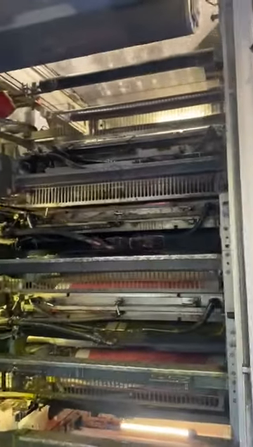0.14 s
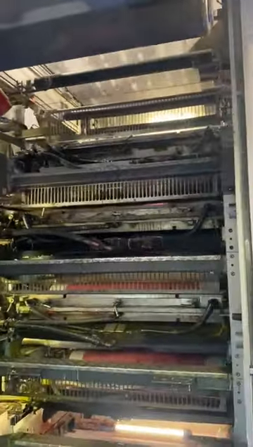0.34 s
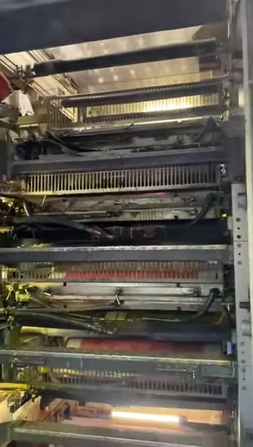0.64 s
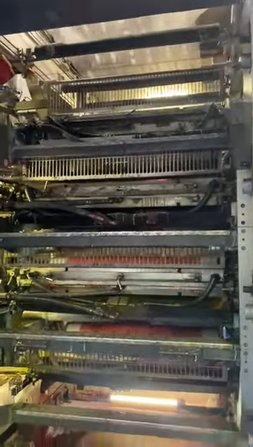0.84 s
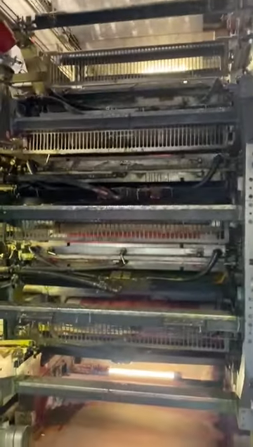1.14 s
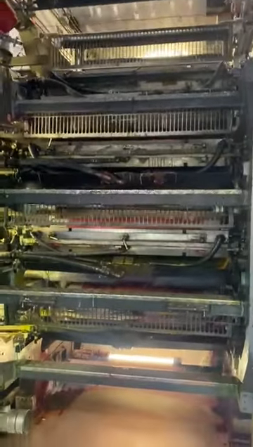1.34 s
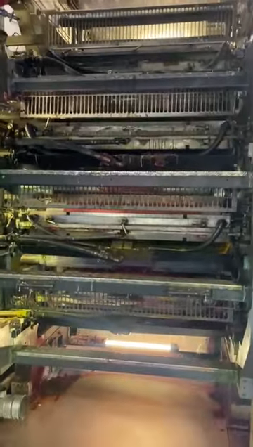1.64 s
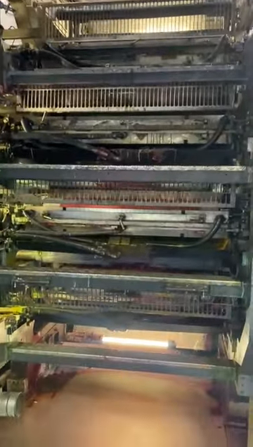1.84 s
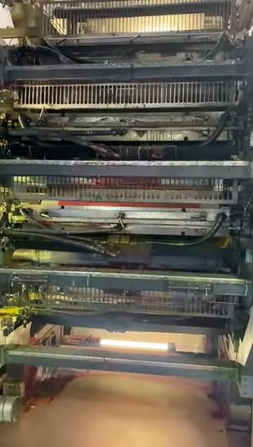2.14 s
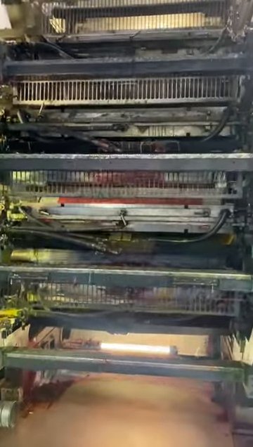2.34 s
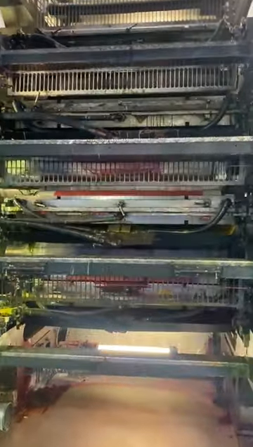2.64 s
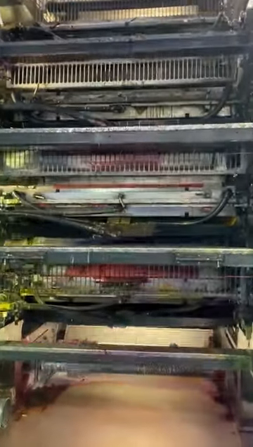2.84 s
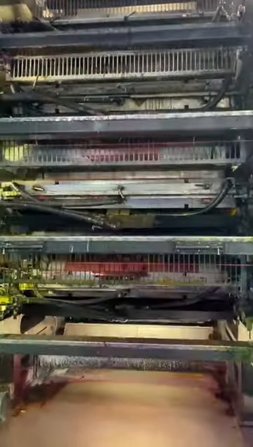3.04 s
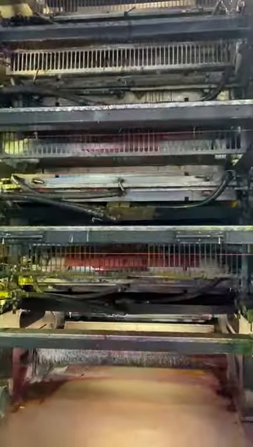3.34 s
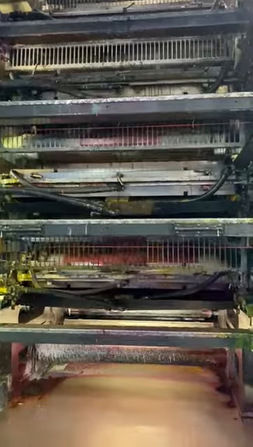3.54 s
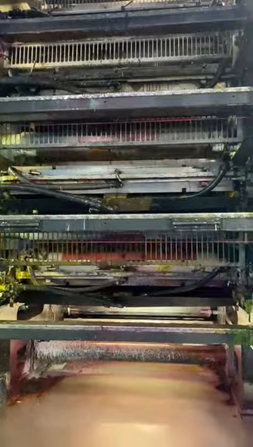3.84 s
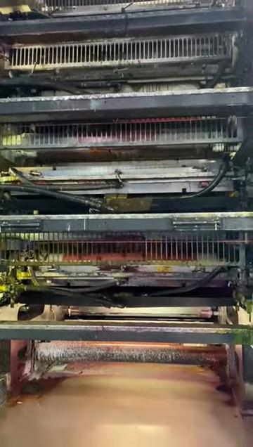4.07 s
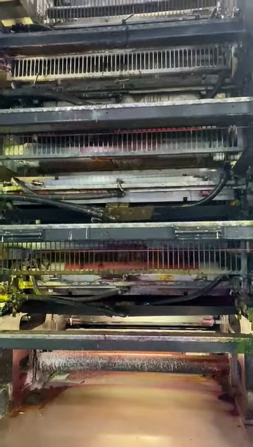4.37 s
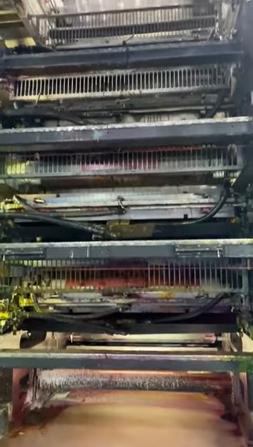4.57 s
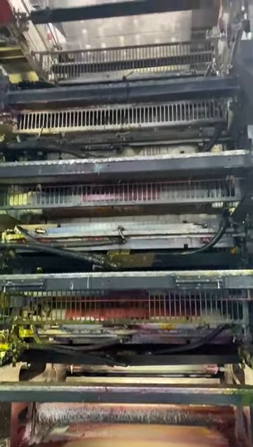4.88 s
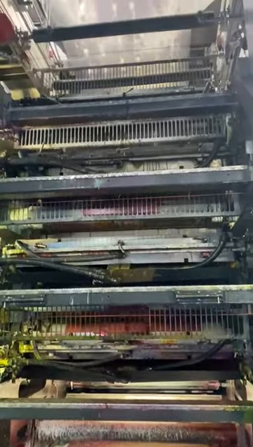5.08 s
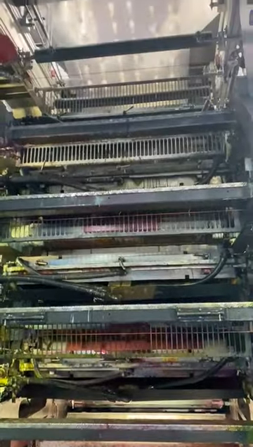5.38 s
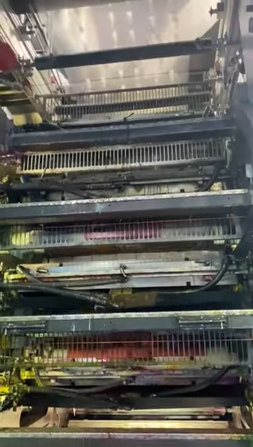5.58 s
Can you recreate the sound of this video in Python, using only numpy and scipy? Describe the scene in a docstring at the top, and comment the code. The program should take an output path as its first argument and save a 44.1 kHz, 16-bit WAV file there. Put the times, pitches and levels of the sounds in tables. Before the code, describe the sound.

A large web printing press runs without pause in a hard factory hall, heard from a few steps away. Broad paper and roller hiss rides over a deep rumble pulsing about seven times a second. Low motor hum wavers, irregular soft thumps blur into the frame, guards chatter finely, and tiny squeaks appear near two seconds. A handheld stereo microphone gives a dense, slightly dull top.

```python
"""A large web printing press runs steadily in a factory hall, heard from a few steps away.
Shaped noise, part of it repeating about seven times a second, makes the frame's rumble and the hall's roar;
brighter noise makes the hiss of paper web and inked rollers. Short chirps thump in the frame.
Wavering sines and narrow noise make the gear, motor and bearing tones; decaying modes are the chattering guards.
Gliding sines squeak faintly, and a swelling sine with noise sidebands is the motor drive's thin whistle."""
import sys
import numpy as np
from scipy import signal
from scipy.fft import rfft, irfft
from scipy.io import wavfile
from scipy.ndimage import uniform_filter1d

SR = 44100
rng = np.random.default_rng(int(sys.argv[2]) if len(sys.argv) > 2 else 0)


def unload_audio(sound):
    """Save the sound as a 16-bit wav file, at the path given as the first command line argument."""
    columns = np.transpose(np.atleast_2d(sound))
    # keep every value between -1 and 1, then stretch to whole-number steps
    steps = np.round(np.clip(columns, -1, 1) * 32767)
    wavfile.write(sys.argv[1], SR, steps.astype(np.int16))


N = 251811
TIME, FREQS = np.arange(N) / SR, np.fft.rfftfreq(N, 1 / SR)


def amp(db):
    """Decibels to gain."""
    return 10 ** (np.asarray(db) / 20)


def unit(x):
    """Scales to rms 1."""
    return x / np.sqrt(np.mean(abs(x) ** 2) + 1e-20)


def across(table, axis=1):
    """One column of a frequency table at every frequency, interpolated over log frequency."""
    rows = np.array(table, float)
    return np.interp(np.log(FREQS + 1), np.log(rows[:, 0] + 1), rows[:, axis])


def along(table, axis=1):
    """One column of a time table at every sample."""
    rows = np.array(table, float)
    return np.interp(TIME, rows[:, 0], rows[:, axis])


def white():
    """Spectrum of white noise with a power of 1 per Hz."""
    return rfft(rng.standard_normal(N)) * np.sqrt(SR / 2)


def drift(rate_hz):
    """Slow random wandering of rms 1: Gaussian low-passed noise on a coarse time grid."""
    size, span_s = 16384, 2 * TIME[-1]
    hz = np.fft.rfftfreq(size, span_s / size)
    spectrum = rfft(rng.standard_normal(size)) * np.exp(-(hz / rate_hz) ** 2)
    slow = irfft(spectrum)
    return unit(np.interp(TIME, np.linspace(0, span_s, size), slow))


def fade(db_per_s):
    """A steady fall in dB, zero halfway through."""
    return db_per_s * (TIME.mean() - TIME)


def fuzzy(hz, width_hz):
    """Noise in one narrow resonance, rms 1."""
    return unit(irfft(white() / (1 + ((FREQS - hz) / width_hz) ** 2), N))


def ports(direct, diffuse):
    """Two microphone ports share one spectrum with a phase lag; scattered sound makes them partly unlike."""
    # the hall at the two ports: freq_hz, likeness_0_to_1, left_lead_rad, left_minus_right_db
    port_table = [(70, .999, -.01, -.4), (260, .997, -.03, -2), (530, .965, -.05, -3.2),
                  (800, .89, -.05, -1.9), (950, .81, -.05, -2.5), (1300, .88, -.1, -.7),
                  (1520, .88, -.08, -.5), (1860, .99, .02, 0), (2250, .87, .27, -.1), (2650, .34, .8, -.7),
                  (2830, .25, .6, -.6), (3020, .26, 1.7, -1.2), (3500, .56, .9, -.8), (3780, .56, 1.05, .1),
                  (3980, .72, .45, -.4), (4350, .57, 1, -2.3), (4600, .5, .6, -2.6), (4850, .76, .15, -.9),
                  (5250, .96, .1, .2), (5600, .81, .48, .3), (6130, .69, 1.85, 0), (6300, .78, 2.1, 0),
                  (6470, .96, 2.85, 0), (6600, 1, 3.1, 0), (8200, 1, 3.2, 0), (9000, .44, 4.7, 0),
                  (9600, 1, 6.2, 0)]
    same = across(port_table, axis=1)
    lead_rad = across(port_table, axis=2)
    tilt = amp(across(port_table, axis=3))
    shared = np.sqrt((1 + same) / 2) * direct
    apart = np.sqrt((1 - same) / 2) * diffuse
    left = (shared + apart) * tilt
    right = (shared - apart) * np.exp(-1j * lead_rad)
    return np.array([left, right]) * np.sqrt(2 / (1 + tilt ** 2))


def wavering(freqs_hz, levels, waver_db, waver_hz, phase_wander_rad, wander_hz):
    """Clean tones, each on its own level curve, unsteady in strength and phase."""
    tones = np.zeros(N)
    for k, hz in enumerate(freqs_hz):
        phase = 2 * np.pi * (hz * TIME + rng.random()) + phase_wander_rad * drift(wander_hz)
        level_db = along(levels, axis=k + 1) + waver_db * drift(waver_hz)
        tones += np.sqrt(2) * amp(level_db) * np.sin(phase)
    return irfft(ports(rfft(tones), 0), N)


def whistle(tone_hz=9998, floor_db=-50, flicker_db=.6, flicker_hz=14, wander_rms_hz=2,
            side_width_hz=6, side_swell_db=2, side_swell_hz=3):
    """The drive's clean switching tone swells and fades as the listener moves; faint sidebands come and go."""
    # swells over the floor: middle_s, half_length_s, level_db
    swell_table = [(.06, .09, -40), (1.33, .06, -43), (1.595, .03, -38.5), (1.95, .03, -45),
                   (2.08, .035, -45), (2.21, .06, -45), (2.45, .1, -48), (2.77, .07, -42),
                   (3.18, .07, -42.5), (3.42, .16, -39.3), (3.61, .04, -38.5), (3.72, .07, -43),
                   (4.61, .09, -44.5), (4.77, .05, -42), (5.08, .06, -43), (5.37, .04, -43)]
    # sidebands that beat against the tone: offset_hz, level_db
    side_table = [(-37, -53.5), (9, -52), (40, -56.5)]
    swell = amp(floor_db)
    for middle_s, half_s, db in swell_table:
        swell = swell + amp(db) * np.exp(-((TIME - middle_s) / half_s) ** 2)
    phase = 2 * np.pi * np.cumsum(tone_hz + wander_rms_hz * drift(19)) / SR
    tone = np.sqrt(2) * swell * amp(flicker_db * drift(flicker_hz)) * np.sin(phase)
    for offset_hz, db in side_table:
        side = fuzzy(tone_hz + offset_hz, side_width_hz) * amp(side_swell_db * drift(side_swell_hz))
        tone += amp(db) * unit(side)
    return irfft(ports(rfft(tone), 0), N)


def whine(width_hz=7):
    """Fast bearings and gears sing faintly inside the hiss, as narrow noise."""
    # fuzzy tones: freq_hz, level_db
    whine_table = [(4630, -53), (4808, -51), (5252, -48.5), (5290, -49.4)]
    tones = sum(amp(db) * fuzzy(hz, width_hz) for hz, db in whine_table)
    return irfft(ports(rfft(tones), 0), N)


def gears():
    """Two fast gear meshes ring out of the hiss now and then."""
    # mesh tones: freq_hz
    mesh_hz = [5442, 5515]
    # level curves: time_s, lower_tone_db, upper_tone_db
    mesh_levels = [(0, -50, -52), (.9, -51, -53), (1.15, -44, -46), (1.35, -48, -43), (1.9, -52, -51),
                   (2.2, -52, -47), (2.9, -49, -50), (3.1, -40, -44.5), (3.5, -41, -50), (3.72, -46, -46),
                   (4.1, -52, -54), (4.75, -53, -53), (4.93, -43.5, -53), (5.35, -51, -54),
                   (5.71, -49, -55)]
    return wavering(mesh_hz, mesh_levels, waver_db=1.5, waver_hz=5, phase_wander_rad=.6, wander_hz=4)


def squeaks(level_db=1.2, rough_rad=.2, rough_hz=150):
    """Rubbing parts give short, slightly scratchy tones, each sliding at its own rate."""
    # squeaks: middle_s, half_length_s, pitch_hz, glide_hz_per_s, relative_level_db
    squeak_table = [(1.744, .009, 2578, 8000, -31), (1.754, .009, 3558, 8000, -35),
                    (2.014, .013, 3617, 4000, -32), (2.014, .01, 2589, -2000, -31.5),
                    (2.22, .026, 2874, 2000, -36.5), (2.28, .032, 2976, 1000, -38.5),
                    (2.385, .026, 2475, 5000, -33.5), (2.42, .02, 2705, 3000, -35),
                    (2.622, .018, 2131, 5000, -33.5)]
    sound = np.zeros(N)
    scratch = rough_rad * drift(rough_hz)
    for middle_s, half_s, hz, glide, db in squeak_table:
        t = TIME - middle_s
        phase = 2 * np.pi * (hz * t + glide * t ** 2 / 2) + scratch
        sound += np.sqrt(2) * amp(db + level_db) * np.exp(-(t / half_s) ** 2) * np.sin(phase)
    return np.array([sound, sound])


def clatter(level_db=-36.5, taps_per_s=200, spread_db=3.8, t60_s=.03, detune=.04):
    """Loose guards chatter at random; each tap rings one mode, slightly shifted."""
    # ringing modes of the guards: freq_hz, relative_level_db
    guard_table = [(1150, 0), (1380, 0), (1760, -1), (2110, 0), (2490, 0), (2950, -1), (3300, -3),
                   (3620, 0), (3950, -4), (4200, -2), (4780, -1), (5280, 0), (5780, 0)]
    t = TIME[:SR // 16]
    sound = np.zeros(N + SR)
    # four uniform draws a tap; a low last draw makes a strong tap
    for at, mode, shift, rarity in rng.random((round(taps_per_s * TIME[-1]), 4)):
        hz, db = guard_table[int(mode * len(guard_table))]
        envelope = amp(db - spread_db * np.log(max(rarity, .05)) - 60 * t / t60_s)
        tap_hz = hz * (1 + detune * (2 * shift - 1))
        sound[int(at * N):][:len(t)] += envelope * np.sin(2 * np.pi * tap_hz * t)
    spectrum = rfft(amp(level_db) * unit(sound[:N]))
    return irfft(ports(spectrum, 1j * spectrum), N)  # quarter-cycle shift makes the diffuse part


def hum(waver_db=1.5, waver_hz=1.2, phase_wander_rad=.35):
    """Gear and motor tones, wavering as their paths through the hall change."""
    # steady tones: freq_hz, level_db
    hum_table = [(85.6, -35.5), (127.6, -40), (171.2, -40.5), (191.2, -42), (300.9, -38), (396.6, -45),
                 (545.5, -45), (615.8, -46.5), (657.1, -46.5)]
    tones = np.zeros(N)
    for hz, db in hum_table:
        phase = 2 * np.pi * (hz * TIME + rng.random()) + phase_wander_rad * drift(waver_hz)
        tones += np.sqrt(2) * amp(db + waver_db * drift(waver_hz)) * np.sin(phase)
    return irfft(ports(rfft(tones), 0), N)


def drone():
    """The main drive's two tones waver just above the roar, growing and shrinking as the listener moves."""
    # drive tones: freq_hz
    drive_hz = [255.3, 446.3]
    # level curves: time_s, low_tone_db, high_tone_db
    drive_levels = [(0, -29.5, -42), (1.0, -31, -33.5), (1.55, -33, -36.5), (2.1, -38, -46),
                    (2.6, -31.5, -39), (2.95, -36, -43), (3.2, -28.5, -41), (3.5, -32, -43),
                    (4.0, -31.5, -39), (4.35, -33, -46), (4.6, -28.5, -43), (5.1, -29, -34.5),
                    (5.42, -36, -41), (5.71, -31, -44)]
    return wavering(drive_hz, drive_levels, waver_db=1.1, waver_hz=6, phase_wander_rad=.35, wander_hz=4)


def patchy(x, depth_db=1.3, patch_s=.035, patch_hz=300):
    """Patches of the hiss in time and frequency swell and dip on their own."""
    z = signal.stft(x, nperseg=512, noverlap=384)[2]
    step_hz, step_s = SR / 512, 128 / SR
    field = rng.standard_normal(z.shape[1:])
    field = uniform_filter1d(field, max(1, round(patch_hz / step_hz)), axis=0)
    field = unit(uniform_filter1d(field, max(1, round(patch_s / step_s)), axis=1))
    gain = unit(amp(depth_db * field))
    return signal.istft(z * gain, nperseg=512, noverlap=384)[1][:, :N]


def web(split_hz=4200, rush_db=-.2, sizzle_db=-.3, flutter_db=.4, flutter_hz=12, fade_db_per_s=.08):
    """Paper rushes past guides, ink splitting in roller nips sizzles above; easing off as the listener moves."""
    # paper web and inked rollers: freq_hz, relative_level_db_per_hz
    hiss_table = [(1650, -61.7), (2110, -59.6), (2350, -62.5), (2490, -59.5), (2970, -60.5), (3050, -61.8),
                  (3430, -63.2), (3600, -61.5), (4050, -66), (4560, -64.4), (4760, -61.8), (5200, -61),
                  (5750, -61.3), (6250, -62.5), (7000, -68.2), (8200, -70.8), (9200, -72.4), (10000, -71.3),
                  (11400, -74.8)]
    sound = ports(white(), white()) * amp(across(hiss_table))
    dull = 1 / (1 + (FREQS / split_hz) ** 16)
    rush = irfft(sound * dull, N) * amp(rush_db + flutter_db * drift(flutter_hz))
    sizzle = irfft(sound * (1 - dull), N) * amp(sizzle_db + flutter_db * drift(flutter_hz))
    return patchy(rush + sizzle) * amp(fade(fade_db_per_s))


def cylinders(turn_hz=7.11):
    """Every turn repeats the same random jolting of gaps, gears and bearings."""
    turn = rng.standard_normal(round(SR / turn_hz))
    return rfft(np.resize(turn, N)) * np.sqrt(SR / 2)


def throb(depth_db=1.3, rate_hz=6.9, first_crest_s=.045):
    """Level of the rumble in dB: a regular throb, about once per cylinder turn."""
    return depth_db * np.cos(2 * np.pi * rate_hz * (TIME - first_crest_s))


def frame(repeat_share=.08, split_hz=150, rumble_db=-.9, roar_db=-.1, shake_db=.4, shake_hz=16, low_cut_hz=18,
          rumble_rise_db_per_s=.3, roar_fade_db_per_s=.2):
    """Repeating jolts and random shaking drive the frame; the deep rumble throbs, the roar flutters."""
    # rumble of the frame and roar of the hall: freq_hz, relative_level_db_per_hz
    body_table = [(25, -61.6), (40, -52), (60, -42.7), (76, -44.4), (115, -44.4), (165, -46), (190, -44.8),
                  (235, -45.6), (300, -45.4), (370, -47.8), (550, -49.8), (830, -52.7), (1000, -57.5),
                  (1370, -58.3), (1600, -61)]
    drive = np.sqrt(repeat_share) * cylinders() + np.sqrt(1 - repeat_share) * white()
    low_cut = 1 - np.exp(-(FREQS / low_cut_hz) ** 2)
    sound = ports(drive, white()) * amp(across(body_table)) * low_cut
    deep = 1 / (1 + (FREQS / split_hz) ** 8)
    rumble_level_db = rumble_db - fade(rumble_rise_db_per_s) + throb()
    # the roar eases off as the listener moves
    roar_level_db = roar_db + fade(roar_fade_db_per_s) + shake_db * drift(shake_hz)
    rumble = irfft(sound * deep, N) * amp(rumble_level_db)
    roar = irfft(sound * (1 - deep), N) * amp(roar_level_db)
    return rumble + roar


def reflections(x, count=14, gain=.095, nearest_s=.002, farthest_s=.016, sway_s=.00016, sway_hz=.6):
    """Steel plates and guards throw sound back; paths change as the listener sways, so fine ripples wander."""
    out = x.copy()
    for delay_s in np.geomspace(nearest_s, farthest_s, count):
        path_s = delay_s * rng.uniform(.9, 1.1) + sway_s * drift(sway_hz)
        echo = np.array([np.interp(TIME - path_s, TIME, side) for side in x])
        out += gain * rng.choice([-1, 1]) * echo
    return out / np.sqrt(1 + count * gain ** 2)


def press(cross_hz=1620, guards_hz=1400):
    """The heavy frame radiates the lows, the light paper the highs; only short waves bounce off the guards."""
    low = 1 / (1 + (FREQS / cross_hz) ** 16)
    sound = rfft(frame()) * np.sqrt(low) + rfft(web()) * np.sqrt(1 - low)
    long_waves = 1 / (1 + (FREQS / guards_hz) ** 4)
    return irfft(sound * long_waves, N) + reflections(irfft(sound * (1 - long_waves), N))


def thumping(x, level_db=2.0, half_s=.03, sag_hz_per_s=60):
    """Each thump sets the frame's shaking near one sagging pitch to its own strength for a few cycles."""
    # heavier thumps and surges of the frame: middle_s, pitch_hz, relative_level_db
    thump_table = [(.06, 117, -26), (.17, 113, -24), (.255, 320, -27), (.3, 118, -24), (.305, 276, -25),
                   (.37, 305, -26), (.4, 193, -25), (.494, 83, -22), (.5, 240, -25), (.63, 89, -26),
                   (.66, 225, -26), (.79, 104, -23), (.862, 134, -23), (.94, 115, -25), (1.01, 250, -26),
                   (1.075, 121, -21.5), (1.215, 113, -21.5), (1.335, 115, -24), (1.42, 105, -22),
                   (1.537, 126, -21.5), (1.59, 280, -25), (1.615, 193, -21.5), (1.655, 158, -23),
                   (1.68, 198, -25), (2.07, 113, -25), (2.09, 395, -29), (2.11, 300, -26), (2.2, 301, -24),
                   (2.57, 245, -25), (2.63, 222, -24.5), (2.68, 270, -24), (2.77, 245, -24),
                   (2.86, 295, -25), (3.034, 98, -20.5), (3.12, 87, -24), (3.21, 65, -24.5),
                   (3.27, 250, -26), (3.335, 150, -25), (3.5, 222, -25), (3.533, 115, -22.5),
                   (3.73, 272, -23.5), (3.914, 255, -23.5), (3.96, 109, -24), (3.98, 302, -25),
                   (4.03, 128, -24.5), (4.11, 67, -24.5), (4.186, 253, -24), (4.21, 91, -25),
                   (4.5, 252, -25), (4.58, 250, -24.5), (4.64, 63, -26), (4.8, 300, -25), (5.075, 255, -24),
                   (5.22, 133, -25), (5.23, 435, -29), (5.39, 195, -26.5), (5.49, 78, -25),
                   (5.54, 330, -27), (5.56, 105, -24)]
    sound = np.zeros(N)
    for middle_s, hz, db in thump_table:
        near = abs(TIME - middle_s) < np.pi * half_s
        t = TIME[near] - middle_s
        swing = np.exp(-(t / half_s) ** 2 + 2j * np.pi * (hz * t - sag_hz_per_s * t ** 2 / 2))
        # complex amplitude of the swing already present; its phase is kept
        shaking = 2 * np.vdot(swing, x[:, near].mean(0)) / np.vdot(swing, swing)
        target = np.sqrt(2) * amp(db + level_db) * np.exp(1j * np.angle(shaking))
        sound[near] += ((target - shaking) * swing).real
    return x + irfft(ports(rfft(sound), 0), N)


def scene():
    """The running press with all its tones and small noises."""
    machine = thumping(press() + hum() + drone())
    return machine + clatter() + squeaks() + gears() + whine() + whistle()


def record(dry, edge_hz=11650):
    """The recorder's band limit: a linear-phase low-pass."""
    taps = signal.firwin(601, edge_hz, window=("kaiser", 9), fs=SR)
    return signal.oaconvolve(dry, taps[None], "same")


dry = scene()
out = record(dry)
unload_audio(out)
```